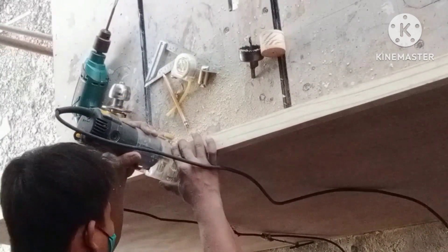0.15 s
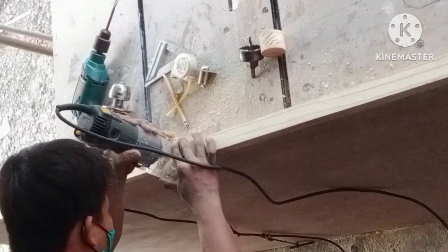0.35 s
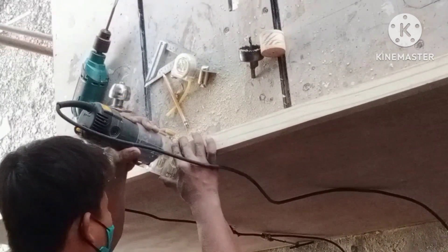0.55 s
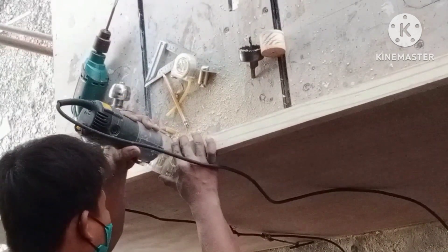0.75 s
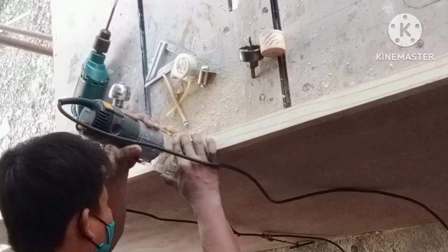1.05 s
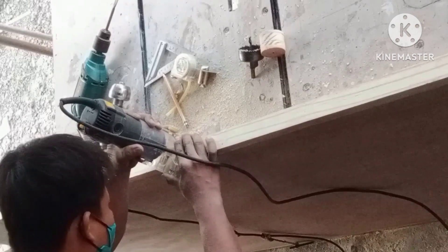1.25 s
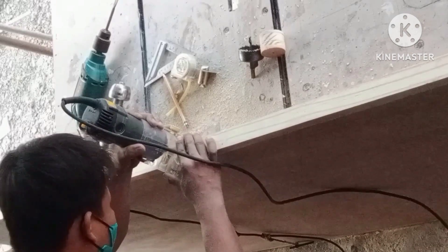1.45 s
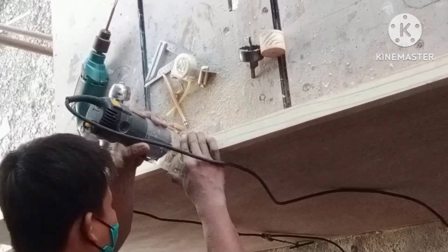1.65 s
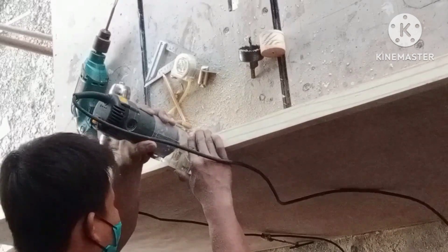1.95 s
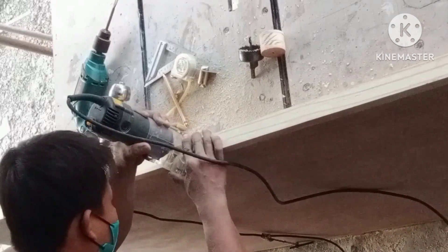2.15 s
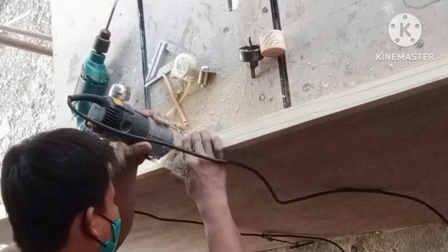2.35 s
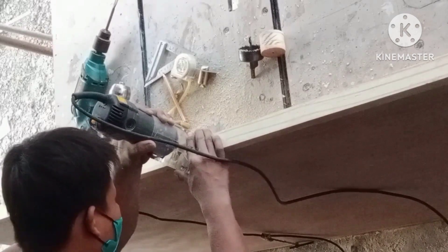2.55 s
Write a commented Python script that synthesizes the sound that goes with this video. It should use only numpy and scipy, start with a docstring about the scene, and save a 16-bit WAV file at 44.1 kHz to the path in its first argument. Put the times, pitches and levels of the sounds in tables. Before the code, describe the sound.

A small electric router runs throughout, cutting a wooden door edge with a high wavering whine, hollow midrange ringing and soft hiss; an early short squeal, then a low microphone bump, in a workshop, heard slightly away.

```python
"""A small electric router works a wooden door edge, heard from a little way off by one microphone.
From the start its two-flute bit sings a stack of sine tones that sags under load, while filtered noise makes
the door's ring, the housing's hum, the hiss and a rumble that soon swells. Soft sine pings begin at half a
second, just ahead of one squeal; a low thud follows as something bumps the microphone, then the rumble swells
twice more. Two sharp bites late on bring up a buzz of further tones."""
import sys
import numpy as np
from scipy import signal
from scipy.fft import rfft, irfft
from scipy.io import wavfile
from scipy.ndimage import uniform_filter1d

SR = 44100
rng = np.random.default_rng(int(sys.argv[2]) if len(sys.argv) > 2 else 0)


def makeup_ratio(level_db):
    """Linear amplitude ratio for a level in decibels (20 dB per factor of ten)."""
    decades = np.asarray(level_db, float) / 20
    return 10 ** decades


def generate_wav(sig):
    """Save sig (samples, or channels by samples) to the path in sys.argv[1] as 16-bit PCM at SR."""
    pcm = np.round(np.clip(np.atleast_2d(sig).T, -1, 1) * 32767).astype(np.int16)
    wavfile.write(sys.argv[1], SR, pcm)


N = 119070
T = np.arange(N) / SR  # time [s]

# Spectrum of the low rumble: (frequency [Hz], relative density [dB per Hz])
RUMBLE_SPECTRUM = [(20, 2), (50, -12.5), (100, -0.5), (150, -1), (220, -14)]
# Swells of the rumble: (centre [s], half length [s], rise [dB])
RUMBLE_SWELLS = [(.38, .04, 8), (.83, .04, 13), (.94, .07, 14)]
RUMBLE_DB, RUMBLE_PATCH_DB = -78.5, 2  # level between swells, depth of the patches

# Spectrum of fan air, brushes and chips: (frequency [Hz], relative density [dB per Hz])
HISS_SPECTRUM = [(200, -24), (742, -26), (900, -14), (1100, -23.5), (1450, -10), (1650, -15.5),
                 (2600, -16.5), (2800, -20.5), (3890, -19.5), (5300, -15), (6590, -20.5), (8200, -14),
                 (15500, -32)]
HISS_DB, HISS_PATCH_DB = -52.5, 1.5

# Steady resonances of the motor housing: (frequency [Hz], width of one pass [Hz], rms level [dB])
HOUSING_RESONANCES = [(325, 54, -73.5), (2094, 250, -68), (175.7, 10.4, -81.5), (461.3, 9.6, -84.5)]

# Bump on the microphone: (start [s], length [s], frequency [Hz], level [dB])
MIC_BUMP = (.763, .023, 112, -40.5)

# Brief tones as the bit catches: (crest time [s], frequency [Hz], rms level at the crest [dB])
CATCHES = [(.55, 835, -66), (.86, 845, -66), (1.13, 1550, -62), (1.35, 825, -63), (1.56, 3505, -65),
           (1.65, 835, -66), (1.935, 3575, -62), (2.28, 825, -62)]
PING_HALF_S = 0.027

# Chatter tone: (start [s], length [s], mid pitch [Hz], level of its main tone [dB])
CHATTER = [(.558, .152, 7608, -44)]
SQUEAL_FALL_HZ, SQUEAL_WOBBLE_HZ = 28, 24  # steady fall, rms random wobble
SQUEAL_UPPER_DB, SQUEAL_THIRD_DB = -6.5, -20  # mixed partner and flute multiple 3, against the main tone
SQUEAL_PEAK, SQUEAL_EDGE = 1.15, 0.6  # exponents: late crest, steep edges
SQUEAL_ROUGH, SQUEAL_RASP = 0.2, 0.12  # rms depth of the slower and faster roughness

# Resonances of the door: (frequency [Hz], width before broadening [Hz], relative level [dB])
DOOR_RESONANCES = [(1252, 36, 0), (1207, 24, -6), (1338, 20, -7), (1140, 18, -15)]
DOOR_BROADENING = 1.94
# Level of the door's ring: (time [s], level [dB])
DOOR_LEVEL = [(0.0, -58.5), (0.19, -50), (0.3, -53), (0.48, -49.5), (0.57, -53), (0.68, -46.5), (0.77, -50),
              (0.89, -47.5), (0.92, -56), (1.0, -47), (1.09, -53.5), (1.19, -49), (1.25, -62), (1.3, -44.5),
              (1.33, -57), (1.46, -43.5), (1.52, -56.5), (1.58, -46.5), (1.65, -55), (1.68, -46.5),
              (1.94, -47.5), (1.98, -53), (2.28, -47.5), (2.37, -57), (2.43, -48.5), (2.64, -57),
              (2.7, -45.5)]
DOOR_FLUTTER_DB, DOOR_FLUTTER_HZ, DOOR_EVEN_S = 3.5, 14, 0.06

# Speed of the bit: (time [s], mean flute rate [Hz])
FLUTE_RATE = [(0.0, 895.0), (0.06, 898.5), (0.17, 898.9), (0.5, 894.2), (0.64, 881.5), (0.73, 879.2),
              (0.94, 895.3), (1.05, 898.9), (1.21, 887.9), (1.49, 876.0), (1.56, 877.9), (1.64, 890.3),
              (1.77, 905.0), (1.97, 895.2), (2.11, 905.1), (2.31, 906.2), (2.42, 905.8), (2.54, 897.1),
              (2.7, 897.0)]
JITTER_HZ, JITTER_RATE_HZ = 1.4, 69  # rms unevenness, how fast it drifts
# Main whine, multiple 8 of the flute rate: (time [s], level before waver [dB])
WHINE_LEVEL = [(0.0, -47.5), (0.11, -53), (0.46, -45.1), (0.75, -50.5), (0.92, -44.5), (1.01, -54),
               (1.17, -44), (1.35, -51.5), (1.55, -46), (1.58, -58.5), (1.65, -47.5), (1.7, -56),
               (1.84, -46.5), (1.89, -49.5), (1.97, -66), (1.99, -46), (2.28, -42), (2.31, -45.5),
               (2.4, -42.5), (2.52, -53), (2.66, -52.5), (2.7, -59)]
# Multiples of the flute rate, in the order of the level columns of STACK_LEVELS: (multiple)
STACK_MULTIPLES = (1, 2, 6, 9, 10, 16)
# Stack of tones: (time [s], then levels of multiples 1, 2, 6, 9, 10, 16 before waver [dB])
STACK_LEVELS = [(0.0, -60.5, -60.5, -65.5, -56.5, -70, -64), (0.41, -62, -54.5, -72, -59, -68, -70),
                (0.53, -61.5, -54, -57.5, -60, -71, -77), (0.65, -82, -60.5, -70, -65, -66, -67),
                (0.69, -68, -53.5, -69, -76, -69, -71), (0.79, -79, -74, -65, -63, -83, -73),
                (0.88, -62.5, -77, -82, -61, -74.0, -71), (1.06, -59, -58.5, -56.5, -61, -67, -98),
                (1.2, -71, -60.5, -69, -62, -63.5, -66), (1.3, -98, -69, -57.5, -58.7, -65, -78),
                (1.35, -79, -64, -62, -67, -59, -70), (1.43, -95, -66, -58.5, -59, -84, -66),
                (1.54, -75, -62, -59, -67, -68, -68), (1.66, -69, -83, -69, -57, -86, -78),
                (1.76, -57.5, -59.5, -62, -61, -67, -68), (1.91, -62.5, -46.5, -63, -50, -54, -77),
                (1.97, -70.5, -52.5, -59, -62, -64, -81), (2.1, -57.5, -77, -65, -56, -75, -70),
                (2.32, -68, -64, -59.5, -61, -66, -77), (2.36, -57.5, -76, -63, -64, -89, -74),
                (2.46, -58.5, -52, -62, -51.5, -54.5, -61), (2.52, -63, -48, -56.5, -59, -53.5, -77),
                (2.7, -65.5, -54, -58.5, -59, -63, -70)]
FOURTH_DB, TWELFTH_DB = -20.5, -4  # multiple 4 against 2, multiple 12 against 10
# Always faintly there: (multiple), with (level before waver [dB])
FAINT_MULTIPLES = (5, 7)
FAINT_LEVELS = [-81, -80]
# Buzz of a sharp bite: (multiple), with (level in full bite, before waver [dB])
BUZZ_MULTIPLES = (11, 13, 14, 15, 17)
BUZZ_LEVELS = [-64, -71, -72, -78, -73]
# Sharp bites into the wood: (start [s], end [s])
SHARP_BITES = [(1.755, 1.98), (2.44, 2.75)]
BITE_EDGE_S, IDLE_DB = 0.02, -16  # fade at each edge, buzz level outside the bites against inside
# rms waver of the whine, multiples 1 and 2, and all others; how fast they drift
WHINE_WAVER_DB, LOW_WAVER_DB, UPPER_WAVER_DB, WAVER_RATE_HZ = 2, 0.7, 2.7, 25


def evened(x):
    """Scales to an rms of one."""
    return x / np.sqrt(np.mean(x ** 2) + 1e-20)


def column(table, index):
    """One column of a curve table, joined by straight lines in time."""
    rows = np.array(table)
    return np.interp(T, rows[:, 0], rows[:, index])


def wander(rate_hz):
    """Slow random drift up to about rate_hz, rms one."""
    hz = np.fft.rfftfreq(N, 1 / SR)
    spectrum = rfft(rng.standard_normal(N)) / (1 + (hz / rate_hz) ** 4)
    return evened(irfft(spectrum, N))


def resonate(x, hz, width):
    """A resonance of gain one at hz: shift it down to zero, smooth, shift back up."""
    turn = np.exp(2j * np.pi * hz * T)
    pole = np.exp(-np.pi * width / SR)
    return 2 * (turn * signal.lfilter([1 - pole], [1, -pole], x / turn)).real


def ringing(hz, width):
    """Noise sent twice through a resonance, for steep skirts."""
    once = resonate(rng.standard_normal(N), hz, width)
    return resonate(once, hz, width)


def coloured(points, patch_db):
    """Noise of the given spectrum with small drifting patches, rms one."""
    real, imaginary, patches = rng.standard_normal((N // 256 + 5, 513, 3)).T
    for axis in (0, 1):  # blur over frequency, then over time
        patches = uniform_filter1d(patches, size=12, axis=axis)
    patches = evened(patches)
    hz = np.fft.rfftfreq(1024, 1 / SR)
    f, db = np.transpose(points)
    shape = np.interp(np.log(hz + 1), np.log(f + 1), db, left=-90, right=-90)
    bins = (real + 1j * imaginary) * makeup_ratio(shape[:, None] + patch_db * patches)
    return evened(signal.istft(bins, nperseg=1024, noverlap=768)[1][:N])


def rumble():
    """Lumpy low rumble at the microphone: low noise with bell-shaped swells."""
    swell_db = sum(db * np.exp(-((T - s) / half) ** 2) for s, half, db in RUMBLE_SWELLS)
    return coloured(RUMBLE_SPECTRUM, RUMBLE_PATCH_DB) * makeup_ratio(RUMBLE_DB + swell_db)


def hiss():
    """Fan air, brushes and flying chips: one broad shaped noise."""
    return coloured(HISS_SPECTRUM, HISS_PATCH_DB) * makeup_ratio(HISS_DB)


def housing():
    """The motor housing hums evenly: noise rings its steady resonances."""
    return sum(makeup_ratio(db) * evened(ringing(hz, width)) for hz, width, db in HOUSING_RESONANCES)


def thud():
    """A short low push on the microphone: a sine under a half-sine swell."""
    start, length, hz, db = MIC_BUMP
    progress = np.clip((T - start) / length, 0, 1)
    return -makeup_ratio(db) * np.sin(np.pi * progress) * np.sin(2 * np.pi * hz * (T - start))


def pings():
    """The bit catches: short soft sine tones that swell and fade."""
    out = np.zeros(N)
    for crest, hz, db in CATCHES:
        swell = np.exp(-((T - crest) / PING_HALF_S) ** 2)
        out += np.sqrt(2) * makeup_ratio(db) * swell * np.sin(2 * np.pi * hz * T)
    return out


def squeal(phase, start, length, hz, db):
    """A short falling chatter tone, with a partner made by mixing with the flute rate."""
    progress = np.clip((T - start) / length, 0, 1)
    pitch = hz - SQUEAL_FALL_HZ * (progress - 0.5) + SQUEAL_WOBBLE_HZ * wander(66)
    own = 2 * np.pi * np.cumsum(pitch) / SR
    tone = np.sin(own)
    tone += makeup_ratio(SQUEAL_UPPER_DB) * np.sin(own + 2 * phase)  # two flute rates up
    tone += makeup_ratio(SQUEAL_THIRD_DB) * np.sin(3 * phase)
    swell = abs(np.sin(np.pi * progress ** SQUEAL_PEAK)) ** SQUEAL_EDGE
    roughness = 1 + SQUEAL_ROUGH * wander(74) + SQUEAL_RASP * wander(490)
    return np.sqrt(2) * makeup_ratio(db) * swell * roughness * tone


def door():
    """The rough force of the cut rings the door; quick flutter is free, the slower level follows the cut."""
    ring = np.zeros(N)
    for hz, width, db in DOOR_RESONANCES:
        flutter_db = DOOR_FLUTTER_DB * wander(DOOR_FLUTTER_HZ)
        ring += makeup_ratio(db + flutter_db) * ringing(hz, width * DOOR_BROADENING)
    span = round(DOOR_EVEN_S * SR)
    power = uniform_filter1d(uniform_filter1d(ring ** 2, span), span)
    return ring / np.sqrt(abs(power) + 1e-20) * makeup_ratio(column(DOOR_LEVEL, 1))


def flute_phase():
    """Phase of the flutes passing the wood, slightly uneven: the running sum of their rate."""
    rate = column(FLUTE_RATE, 1) + JITTER_HZ * wander(JITTER_RATE_HZ)
    return 2 * np.pi * np.cumsum(rate) / SR


def bit(phase):
    """The flutes striking the wood: sines at multiples of the flute rate, each wavering on its own."""
    levels = [(k, column(STACK_LEVELS, i + 1)) for i, k in enumerate(STACK_MULTIPLES)]
    bite = sum(np.clip(np.minimum(T - start, end - T) / BITE_EDGE_S, 0, 1) for start, end in SHARP_BITES)
    levels += [(k, db + IDLE_DB * (1 - bite)) for k, db in zip(BUZZ_MULTIPLES, BUZZ_LEVELS)]
    levels += [(12, column(STACK_LEVELS, 5) + TWELFTH_DB)]  # follows multiple 10
    levels += [(4, column(STACK_LEVELS, 2) + FOURTH_DB)]  # follows multiple 2
    levels += list(zip(FAINT_MULTIPLES, FAINT_LEVELS))
    whine_db = column(WHINE_LEVEL, 1) + WHINE_WAVER_DB * wander(WAVER_RATE_HZ)
    out = makeup_ratio(whine_db) * np.sin(8 * phase)
    for k, db in levels:
        depth_db = LOW_WAVER_DB if k in (1, 2) else UPPER_WAVER_DB  # upper multiples stutter more
        waver_db = depth_db * wander(WAVER_RATE_HZ)
        out += makeup_ratio(db + waver_db) * np.sin(k * phase + 2 * np.pi * rng.random())
    return np.sqrt(2) * out  # levels are rms


def scene():
    """All sources, alike in both channels."""
    phase = flute_phase()
    background = rumble() + hiss() + housing()
    events = thud() + pings() + squeal(phase, *CHATTER[0])
    mix = background + events + door() + bit(phase)
    return np.tile(mix, (2, 1))


def band_limit(x):
    """A steep low-pass at the top of the band."""
    return signal.sosfilt(signal.butter(12, 15680, fs=SR, output="sos"), x)


def record(dry):
    """Delivers the finished mix."""
    return band_limit(dry)


dry = scene()
out = record(dry)
generate_wav(out)
```